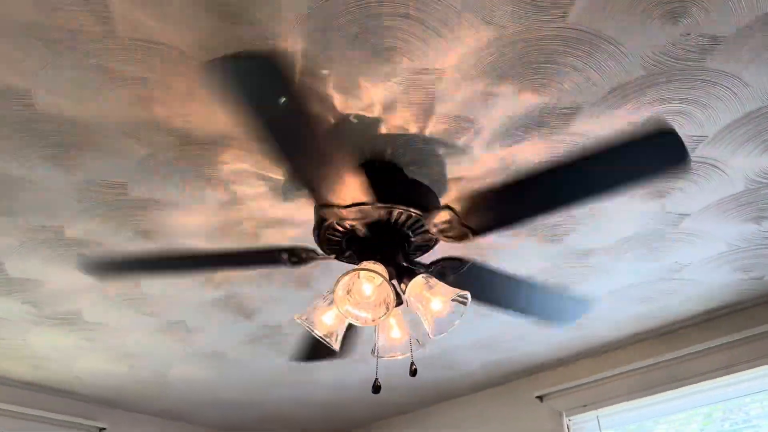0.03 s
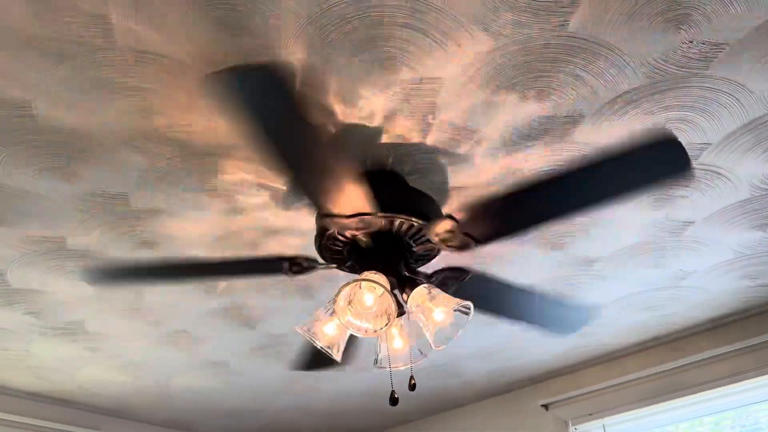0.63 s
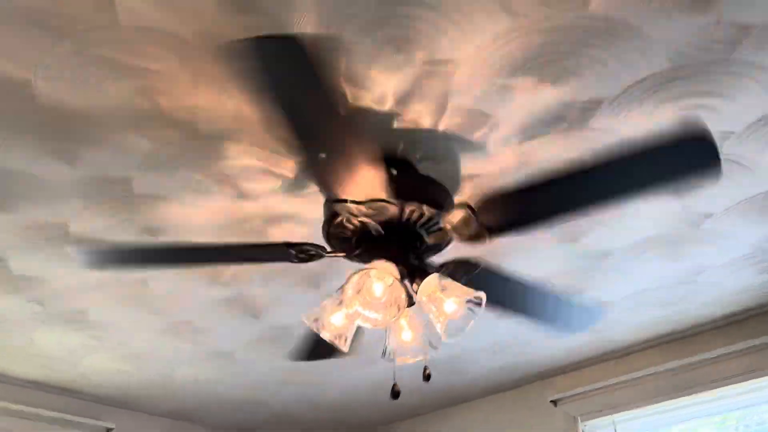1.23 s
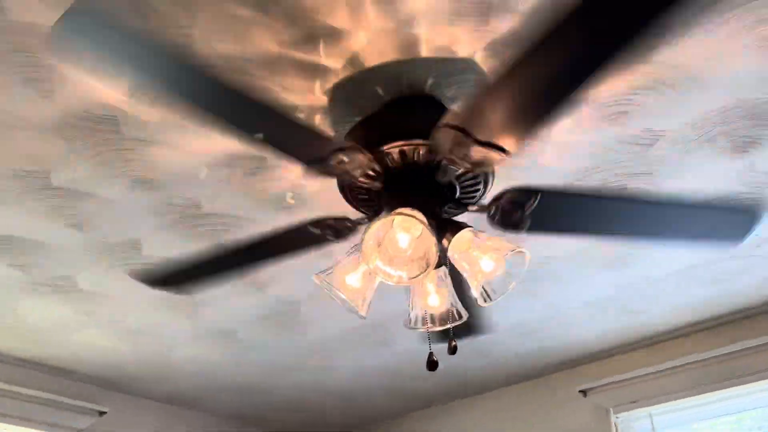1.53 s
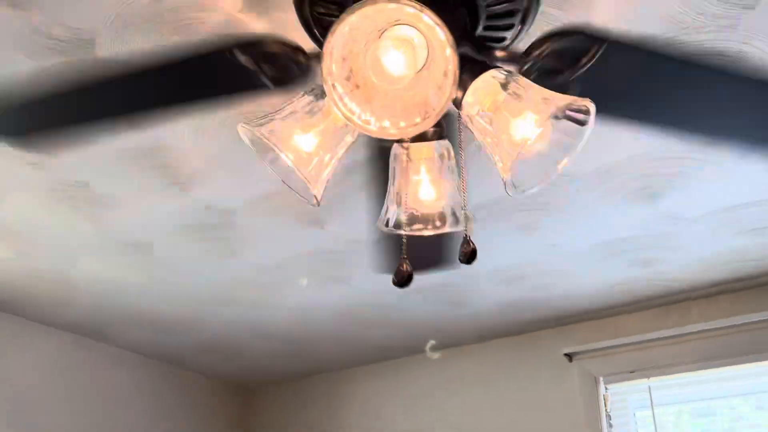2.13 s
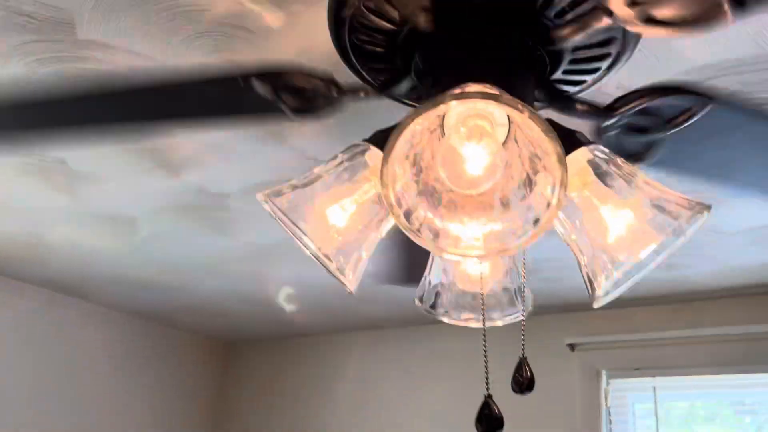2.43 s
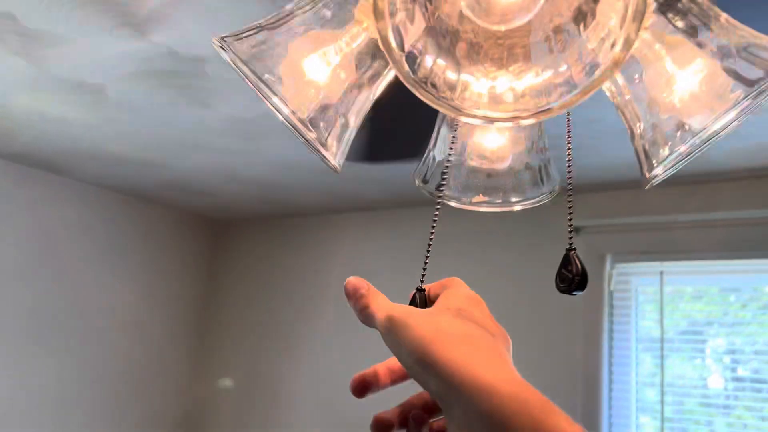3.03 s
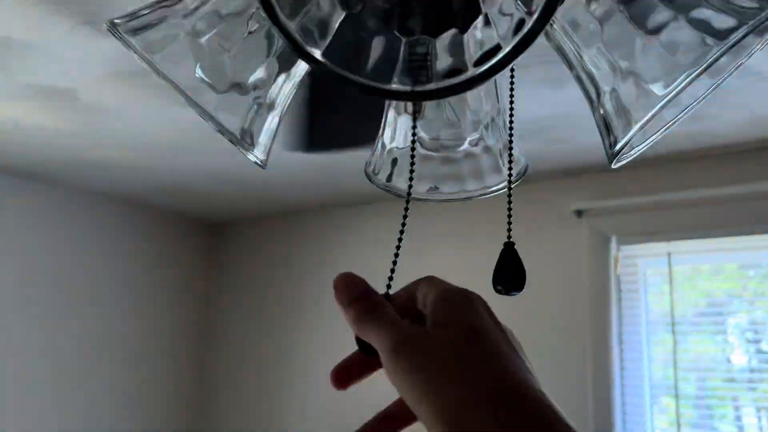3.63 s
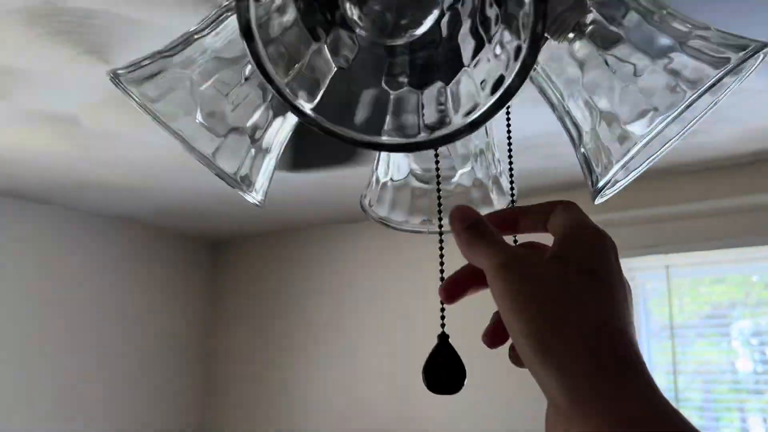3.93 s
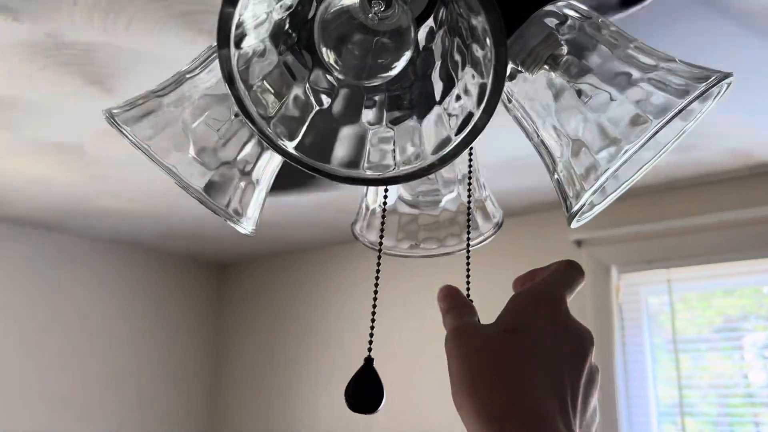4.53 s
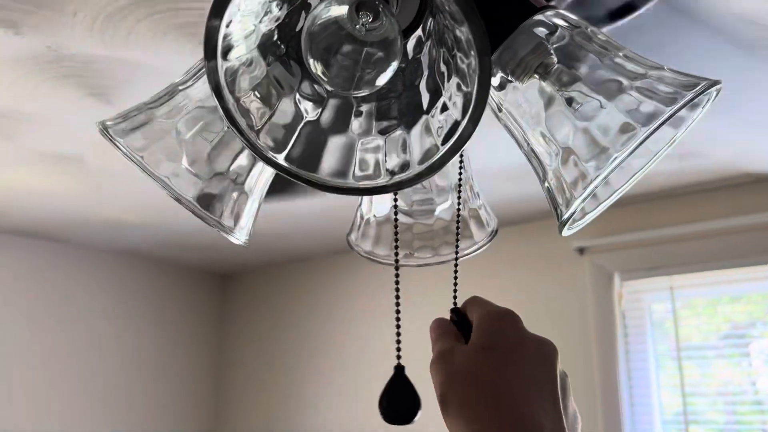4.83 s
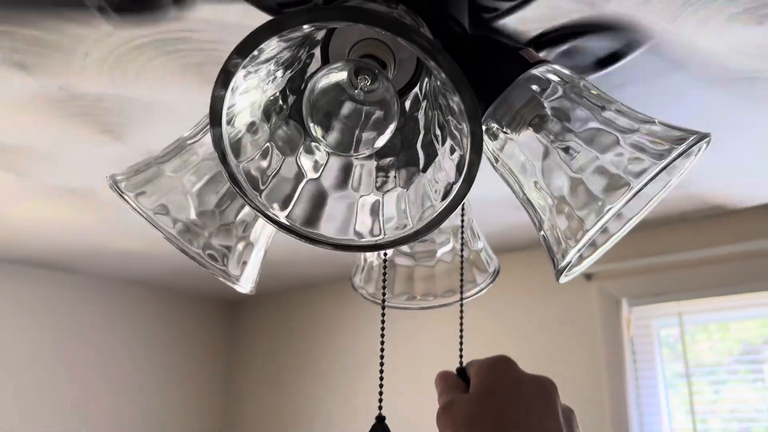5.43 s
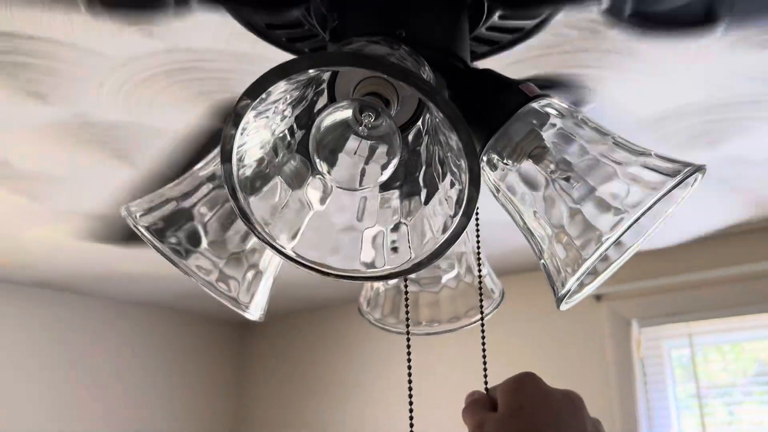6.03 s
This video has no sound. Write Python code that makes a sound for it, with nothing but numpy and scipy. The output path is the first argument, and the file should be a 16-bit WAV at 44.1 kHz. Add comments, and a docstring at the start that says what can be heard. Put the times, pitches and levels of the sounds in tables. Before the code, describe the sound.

A ceiling fan runs throughout in a small room, a soft, steady rush of air over a faint motor hum. Clothes rustle briefly at the start and again around 1.6 to 2 seconds, while a few light ticks and dull footsteps come between 1.2 and 2.5 seconds. From about 3 to 3.5 seconds the downdraught buffets the hand-held microphone with a loud, low rumble. A pull-chain switch snaps sharply at 3.4 seconds and louder on release at 3.6. The rumble fades and the sound turns thinner, with soft, dull handling knocks running on to the end. The second chain snaps four times, at about 5.2, 5.5, 5.9 and 6.1 seconds. Beads tick and scrape just before each snap, and each leaves a slight jingle and a faint ring of the metal housing and glass shades. The fan keeps whooshing underneath.

```python
"""A ceiling fan rushes and hums in a small room; clothes rustle and steps thud as someone walks up to it.
The blades' downdraught buffets a hand-held microphone, then the fan's two pull chains are worked.
The light switch snaps twice (pull, release), the speed switch four times; beads tick in the ferrule
before each snap, and every contact rings the housing. Soft handling knocks run on to the end."""
import sys
import numpy as np
from scipy import signal
from scipy.fft import rfft, irfft, next_fast_len
from scipy.io import wavfile
from scipy.ndimage import map_coordinates

SR = 44100
rng = np.random.default_rng(int(sys.argv[2]) if len(sys.argv) > 2 else 0)


def to_wav(s):
    """Save 16-bit WAV."""
    ch = np.atleast_2d(s).T  # columns
    pcm = np.round(np.clip(ch, -1, 1) * 32767)  # PCM
    wavfile.write(sys.argv[1], SR, pcm.astype(np.int16))


N = 277830

# switch snaps: t/s, body/dB, crack/dB, sizzle/dB, lead-in scrape/dB
SWITCH_SNAPS = [(3.391, -39.5, -37.5, -36.5, -50.5), (3.584, -27.5, -31, -35, -58),
                (5.2135, -32, -33.5, -36.5, -68), (5.479, -37.5, -34.5, -32, -69),
                (5.8601, -36, -34.5, -42, -65), (6.1287, -39, -34.5, -35, -61)]
# edge below which the sound thins out: t/s, f/Hz
BASS_CUTOFF = [(3.38, 25), (3.43, 103.6), (3.98, 116.5), (4.08, 181.4), (4.5, 179), (5.1, 218.7),
               (6.3, 198)]


def amp(db):
    """Decibels to gain."""
    return 10 ** (np.asarray(db) / 20)


def unit(x):
    """Scale to rms 1."""
    return x / np.sqrt(np.mean(x ** 2) + 1e-20)


def along(points, hz):
    """Interpolate (f/Hz, value) rows on a log axis."""
    f, v = np.transpose(points)
    return np.interp(np.log(hz + 1), np.log(f + 1), v)


def curve(rows):
    """(t/s, value) rows to one value per sample."""
    return np.interp(np.arange(N) / SR, *np.transpose(rows))


def wobble(rate_hz):
    """Smooth random curve through Gaussian knots."""
    knots = rng.standard_normal(int(N * rate_hz / SR) + 4)
    return map_coordinates(knots, [np.arange(N) * rate_hz / SR])


def add(track, s, sound):
    """Mix a sound into a track from time s."""
    part = track[..., max(0, round(s * SR)):][..., :sound.shape[-1]]
    part += sound[..., :part.shape[-1]]


def filtered(x, response):
    """Apply a frequency response by FFT."""
    n = x.shape[-1]
    m = next_fast_len(n + 8192)
    return irfft(rfft(x, m) * response(np.fft.rfftfreq(m, 1 / SR)), m)[..., :n]


def diffuse(pair):
    """Two unrelated signals become a diffuse field at the two microphone ports."""
    # left-right likeness: f/Hz, correlation
    coherence = [(100, 0.92), (300, 0.74), (600, 0.69), (1300, 0.2), (2500, 0.44), (5000, 0.13),
                 (8000, 0.92), (12000, 1)]
    turn = lambda hz: np.arccos(np.clip(along(coherence, hz), -1, 1)) / 2
    mid, side = filtered(pair, lambda hz: np.array([np.cos(turn(hz)), np.sin(turn(hz))]))
    return np.array([mid + side, mid - side])


def rush(spectrum):
    """Diffuse stereo noise, rms 1, shaped by (f/Hz, density/dB) rows."""
    white = rng.standard_normal((2, N))
    return unit(diffuse(filtered(white, lambda hz: amp(along(spectrum, hz)))))


def fan():
    """The blades push a steady rush of air, swelling a little; the motor hums."""
    # air rush: t/s, relative level/dB
    flow = [(0.0, -54.5), (1.09, -55), (1.93, -50.5), (3.74, -51.5), (3.95, -52.5), (5.12, -53),
            (5.26, -49), (6.3, -52.5)]
    # air spectrum: f/Hz, density/dB
    air_spectrum = [(59, -31), (100, -6.5), (229, -12.5), (328, -9), (381, -8.5), (558, -12), (752, -17.5),
                    (970, -24), (1130, -21), (2370, -40), (2520, -40), (3470, -47), (5080, -54.5),
                    (7610, -61.5), (16000, -64.5)]
    # motor lines: f/Hz, rms level/dB
    motor_lines = [(120, -74.5), (162, -69.5), (280, -75), (381, -69.5)]
    t = np.arange(N) / SR
    air = amp(curve(flow) + 1.5 + 0.75 * wobble(6.2)) * rush(air_spectrum)
    hum = np.zeros(N)
    for hz, db in motor_lines:
        peak = np.sqrt(2) * amp(db + 0.89 * wobble(2.1))
        hum += peak * np.sin(2 * np.pi * hz * t + 0.42 * wobble(3.5))
    return air + hum


def bumps(rows, cycles):
    """Soft pressure bumps a cycle or two long, from (t/s, peak/dB, f/Hz) rows."""
    out, t = np.zeros(N), np.arange(-SR // 20, SR // 20) / SR
    for (s, db, hz), phase in zip(rows, rng.uniform(0, 2 * np.pi, len(rows))):
        add(out, s + t[0], amp(db) * np.cos(2 * np.pi * hz * t + phase) / np.cosh(t * hz / cycles))
    return out


def downdraught():
    """Air from the blades tumbles over the microphone: a rumble with single puffs."""
    # rumble strength: t/s, level/dB
    draught = [(0, -50), (.7, -57), (1.9, -47), (2.4, -44), (2.85, -46.5), (2.96, -30), (3.08, -20.5),
               (3.22, -30.5), (3.37, -26.5), (3.5, -43), (3.75, -37.5), (4.1, -54)]
    # rumble spectrum: f/Hz, density/dB
    rumble_spectrum = [(20, -25), (40, -0.5), (60, 2.5), (110, -8), (180, -9.5), (300, -18), (600, -38),
                       (1500, -83)]
    # strongest puffs: t/s, relative peak/dB, f/Hz
    puffs = [(2.97, -14, 128), (2.993, -14.5, 87), (3.045, -16, 185), (3.063, -10, 120),
             (3.093, -17.5, 250), (3.14, -18, 190), (3.169, -17, 81), (3.244, -14.5, 121), (3.35, -15, 97)]
    rumble = amp(curve(draught)) * rush(rumble_spectrum)
    return rumble + amp(0.5) * bumps(puffs, cycles=0.34)


def strokes(rows, rise_db=46, fall_db_per_s=191):
    """Gain of rubbing strokes: each swells by rise_db per length, holds for one length and fades."""
    t, power = np.arange(N) / SR, np.zeros(N)
    for s, length_s, db in rows:
        before_db = rise_db * np.maximum(s - t, 0) / length_s
        after_db = fall_db_per_s * np.maximum(t - s - length_s, 0)
        power += amp(db - before_db - after_db) ** 2
    return np.sqrt(power)


def clothes(fizz_db=-5, fizz_exponent=2.1):
    """Cloth rubs in scratchy strokes; the harder the stroke, the more it fizzes."""
    # cloth strokes: t/s, length/s, relative level/dB
    rustles = [(0, .11, -50), (.655, .025, -80), (1.17, 0.29, -71.5), (1.625, 0.033, -54.5),
               (1.7, .06, -58.5), (1.83, 0.25, -69), (1.975, 0.056, -61), (2.2, 0.42, -82),
               (2.505, 0.012, -72)]
    # rub spectrum: f/Hz, density/dB
    cloth_spectrum = [(300, -27), (1000, 8.5), (2200, 3), (3100, 2.5), (3800, -1.5), (5000, 6.5), (5900, 0),
                      (6800, -8), (11000, -23.5), (16000, -24.5)]
    # fizz spectrum: f/Hz, density/dB
    fizz_spectrum = [(4500, -28), (6000, 4), (8000, -3.5), (12000, -5), (16000, -6)]
    gain = strokes(rustles)
    grain = amp(2.0 * wobble(60) + 1.3 * wobble(400))
    rub = amp(0.5) * gain * unit(grain * rush(cloth_spectrum))
    fizz_gain = amp(fizz_db) * gain.max() * (gain / gain.max()) ** fizz_exponent
    return rub + fizz_gain * unit(grain * rush(fizz_spectrum))


def band_impulse(resonances, lo_hz, hi_hz, size=2048):
    """Minimum-phase impulse response, energy 1, of resonances within one band."""
    f = np.fft.rfftfreq(size, 1 / SR) + 1
    power = sum(amp(db) ** 2 / (1 + ((f - hz) / width) ** 2 * 2) ** 2 for hz, width, db in resonances)
    band_loss = (1 + (lo_hz / f) ** 10) * (1 + (f / hi_hz) ** 20)
    cepstrum = irfft(np.log(power / band_loss + 1e-12) / 2)
    cepstrum[1:size // 2] *= 2
    cepstrum[size // 2 + 1:] = 0
    impulse = irfft(np.exp(rfft(cepstrum)))
    return impulse / np.linalg.norm(impulse)


def room_tail(build_s):
    """A fresh room response, energy 1 a channel; each frequency dies at its own rate."""
    # room decay: f/Hz, t60/s
    room_t60 = [(300, 0.78), (1000, 0.2), (3000, 0.32), (5000, 0.3), (8000, 0.23), (15000, 0.16)]
    hz, t, z = signal.stft(rng.standard_normal((2, SR // 2)), SR, nperseg=256)
    tail = signal.istft(z * amp(-60 * t / along(room_t60, hz)[:, None]), SR, nperseg=256)[1]
    onset = 1 - np.exp(-np.arange(tail.shape[1]) / SR / build_s)
    return unit(diffuse(tail * onset)) / np.sqrt(tail.shape[1])


def contact(colour, tail, t60, hardness, blow=3.5, graze_s=0.00073, spread=0.35):
    """One band of a click: a blow (hard) or graze (soft), a brief rattle, then the room."""
    t = np.arange(SR // 20) / SR
    onset = 1 - (1 - hardness) * np.exp(-t / graze_s)
    mid, side = rng.standard_normal((2, len(t))) * amp(-60 * t / t60) * onset
    mid[0] += blow * hardness
    side = spread * filtered(side, lambda hz: hz < 7500)
    sound = tail.copy()
    add(sound, 0, np.array([mid + side, mid - side]) / np.linalg.norm(mid))
    return signal.fftconvolve(sound, colour[None], axes=1) * np.sqrt(.006 * SR)


def click(resonances, levels_db, hardness, wet_db, scatter_db=2.5):
    """A contact stirs each resonance at a new strength; body, crack and sizzle die at their own rates."""
    # body, crack, sizzle bands: low/Hz, high/Hz, rattle t60/s, room send/dB
    bands = [(519, 2620, 0.029, -2), (2500, 9700, 0.04, -1.5), (8890, 13250, .009, -3.5)]
    stirred = [(hz, width, db + scatter_db * rng.standard_normal()) for hz, width, db in resonances]
    tail = amp(wet_db) * room_tail(build_s=0.001)
    gains = amp(np.array(levels_db) + [-.8, .3, 1.7] + 1.5 * hardness)
    return sum(gain * contact(band_impulse(stirred, lo, hi), amp(room_db) * tail, t60, hardness)
               for gain, (lo, hi, t60, room_db) in zip(gains, bands))


def small_ticks():
    """Small things tick and knock close to the microphone."""
    # ticks, relative levels: t/s, body/dB, crack/dB, sizzle/dB
    ticks = [(1.1981, -44, -66.5, -78), (1.235, -51.5, -69, -86), (1.627, -64, -55, -61),
             (2.496, -73, -66, -74), (4.2446, -71, -72, -94), (4.755, -48, -87.5, -100)]
    # their resonances: f/Hz, width/Hz, level/dB
    resonances = [(850, 440, 4.5), (1360, 260, 2), (2400, 290, -9), (3200, 600, -19), (5340, 1800, -15),
                  (11900, 7000, -15)]
    out = np.zeros((2, N))
    for s, *levels_db in ticks:
        add(out, s, amp(-4.0) * click(resonances, levels_db, hardness=1, wet_db=-1))
    return out


def footsteps(attack_s=.005):
    """Steps thud in the floor, each mode a little off its usual pitch."""
    # footfalls and thuds: t/s, relative level/dB, tilt/(dB/octave)
    thuds = [(1.201, -42.5, 1), (1.706, -33.5, 0), (1.977, -29, 5.5), (2.135, -36, -13), (2.197, -21, -7),
             (2.285, -22, -7), (2.455, -31, -5.5), (2.516, -23.5, -5.5)]
    # floor modes: f/Hz, level/dB, t60/s
    floor_modes = [(66.9, 1.5, .16), (108, -1, 0.12), (163.6, -6.5, 0.15), (234.6, -9.5, 0.27),
                   (333, -21, 0.27)]
    out, t = np.zeros(N), np.arange(SR // 2) / SR
    onset = 1 - np.exp(-t / attack_s)
    for s, db, tilt in thuds:
        for hz, mode_db, t60 in floor_modes:
            level_db = db + 2.0 + mode_db + tilt * np.log2(hz / floor_modes[0][0])
            pitch_hz = hz * (1 + .05 * rng.standard_normal())
            add(out, s, amp(level_db - 60 * t / t60) * onset * np.sin(2 * np.pi * pitch_hz * t))
    return out


def bead_chains(travel_s=.098, rise_db_per_s=111, jingle_db=-28.5, fall_db_per_s=77):
    """The tightening chain scrapes through its ferrule; loose beads jingle in the hand and after snaps."""
    # beads slip through the fingers: t/s, length/s, level/dB
    grips = [(2.87, 0.38, -75), (4.24, 0.23, -86.5), (5.3, 0.25, -66.5)]
    # jingle spectrum: f/Hz, density/dB
    bead_spectrum = [(2500, -23), (4200, -4), (4700, 0), (5200, -1), (6000, -12.5), (7500, -22.5),
                     (9600, -17.5), (11500, -30), (14000, -22.5), (16000, -28)]
    # scrape spectrum: f/Hz, density/dB
    ferrule_spectrum = [(700, -9), (1800, -5.5), (2700, 4.5), (3700, -12.5), (4800, -6.5), (7000, -13),
                        (11000, -24), (14000, -29)]
    t = np.arange(N) / SR
    taut, loose = np.zeros(N), strokes(grips)
    for s, _, crack_db, _, scrape_db in SWITCH_SNAPS:
        taut += amp(scrape_db - rise_db_per_s * abs(t - s)) * (t > s - travel_s) * (t < s)
        loose += amp(crack_db + jingle_db - fall_db_per_s * abs(t - s)) * (t > s)
    jingle = loose * unit(amp(1.5 * wobble(200)) * rush(bead_spectrum))
    scrape = taut * unit(amp(3.5 * wobble(200)) * rush(ferrule_spectrum))
    return jingle + scrape


def housing_ring():
    """The metal housing and glass shades ring, slightly detuned at each contact."""
    # housing and shade modes: f/Hz, level/dB, t60/s
    housing_modes = [(1160, 1, .33), (1217, -5, .33), (1314, -2, .3), (1549, 0, .22), (1876, 3, .55),
                     (1970, -8, .3), (2143, -4, .25), (2788, -6, .25), (2905, 3, .25), (3158, -6, .2),
                     (3590, 1, .16), (3715, -2, .2), (3991, -1, .22), (4700, -6, .45), (5670, -14, .27),
                     (7730, -18, .35)]
    hz, db, t60 = np.transpose(housing_modes)
    t = np.arange(SR * 2 // 3) / SR
    detuned_hz = hz * (1 + 0.00066 * rng.standard_normal(len(hz)))
    modes = amp(db[:, None] - 60 * t / t60[:, None]) * np.sin(2 * np.pi * detuned_hz[:, None] * t)
    scatter_db = rng.normal(0, 2.0, len(hz)) + rng.normal(0, 1.5, (2, len(hz)))
    strengths = amp(scatter_db) * rng.choice([-1, 1], len(hz))
    return strengths @ modes


def pull_switches(speed_from_s=3.8, catch_hardness=0.21, ring_db=-20.5):
    """Beads graze the ferrule and the sprung ratchet snaps over hard; each contact rings the housing."""
    # beads catching in the ferrule: t/s, level/dB, brightness/dB
    bead_catches = [(3.2926, -50.5, -6.5), (3.3303, -54.5, -11), (3.376, -50, -6), (3.541, -61.5, -9),
                    (3.571, -45, -4), (3.908, -71.5, -6), (5.0467, -58.5, -10), (5.1577, -49.5, -8),
                    (5.2011, -40.5, -4), (5.441, -44.5, 2.5), (5.461, -42.5, -4), (5.73, -72.5, -6),
                    (5.8173, -49, -8), (5.8456, -42.5, -8), (6.0259, -53.5, -3.5), (6.077, -44.5, 3),
                    (6.0987, -44, -6)]
    # light switch resonances: f/Hz, width/Hz, level/dB
    light_switch = [(830, 1300, 0), (1440, 180, -6.5), (2300, 320, -8.5), (2970, 430, 5.5), (3800, 300, 0),
                    (4780, 310, 0), (5730, 780, 1.5), (7800, 580, -9), (10800, 1300, -11.5),
                    (13000, 1640, -20), (15300, 1500, -7.5)]
    # speed switch resonances: f/Hz, width/Hz, level/dB
    speed_switch = [(1160, 620, 5), (1550, 190, 10.5), (2015, 370, 5.5), (2640, 360, -0.5),
                    (3620, 420, -2.5), (4060, 140, 0), (4890, 600, -1.5), (5920, 400, -9),
                    (7700, 2250, -11.5), (10100, 710, -11.5), (12050, 530, -15.5), (14650, 920, -1)]
    out = np.zeros((2, N))
    snaps = [(*row[:4], 1) for row in SWITCH_SNAPS]
    catches = [(s, db - bright, db, db + bright, catch_hardness) for s, db, bright in bead_catches]
    for s, body_db, crack_db, sizzle_db, hardness in snaps + catches:
        switch, wet_db = (light_switch, -1) if s < speed_from_s else (speed_switch, -0.5)
        add(out, s, click(switch, (body_db, crack_db, sizzle_db), hardness, wet_db))
        add(out, s, amp((body_db + crack_db) / 2 + ring_db) * housing_ring())
    return out


def handling(patter_from_s=3.6, patter_count=110, weakest_db=-49, range_db=11.5):
    """The hand shifts its grip: dull knocks over a weaker patter, higher as the bass thins out."""
    # strongest knocks: t/s, relative peak/dB
    hand_knocks = [(3.42, -32), (3.449, -34), (3.611, -33.5), (3.68, -25.5), (3.814, -29.5), (3.838, -28),
                   (3.872, -26.5), (4.314, -32), (4.336, -30.5), (4.525, -27), (4.598, -33.5),
                   (4.612, -29.5), (4.758, -27.5), (4.92, -38.5), (4.993, -36.5), (5.111, -36),
                   (5.339, -32.5), (5.413, -30.5), (5.614, -38), (5.841, -32.5), (5.895, -35.5),
                   (6.215, -39.5)]
    pitch_hz = lambda s: 2.026 * np.interp(s, *np.transpose(BASS_CUTOFF))
    when, size, detune = rng.random((patter_count, 3)).T
    times_s = patter_from_s + (N / SR - patter_from_s) * when
    patter_hz = pitch_hz(times_s) * (.7 + .7 * detune)
    patter = np.column_stack([times_s, weakest_db + range_db * size, patter_hz])
    knocks = [(s, db, pitch_hz(s)) for s, db in hand_knocks]
    return amp(4.0) * bumps(knocks, cycles=0.25) + bumps(patter, cycles=0.81)


def scene():
    """Everything heard under the fan."""
    fixture = fan() + pull_switches() + bead_chains()
    approach = footsteps() + small_ticks() + clothes()
    return fixture + approach + downdraught() + handling()


def record(dry, low_hz=42, top_hz=16100):
    """The bass thins after the buffeting; the ports differ in level and treble phase; both ends are cut."""
    # left minus right: f/Hz, level/dB
    balance = [(250, 0), (550, 1.8), (1100, 3.2), (2200, .4), (4200, 1.8), (8000, 0)]
    # left ahead of right: f/Hz, phase/rad
    phase_lead = [(7500, 0), (8600, -.9), (9300, -2.8), (10000, -3.4), (11000, -5.6), (12400, -6.8),
                  (13200, -9.1), (13800, -9.7), (14700, -12), (16000, -12.5)]
    hz, t, z = signal.stft(dry, SR, nperseg=2048, noverlap=1536)
    edge_hz = np.interp(t, *np.transpose(BASS_CUTOFF))
    high_pass = 1 / np.sqrt(1 + (edge_hz / (hz[:, None] + 1)) ** 14)
    thinned = signal.istft(z * high_pass, SR, nperseg=2048, noverlap=1536)[1][:, :N]
    half = np.array([[.5], [-.5]])
    ports = lambda f: amp(half * along(balance, f)) * np.exp(1j * half * along(phase_lead, f))
    low_cut = lambda f: 1 / np.sqrt(1 + (low_hz / (f + 1)) ** 4)
    top_cut = lambda f: 1 / np.sqrt(1 + (f / top_hz) ** 160)
    return filtered(thinned, lambda f: ports(f) * low_cut(f) * top_cut(f))


dry = scene()
out = record(dry)
to_wav(out)
```